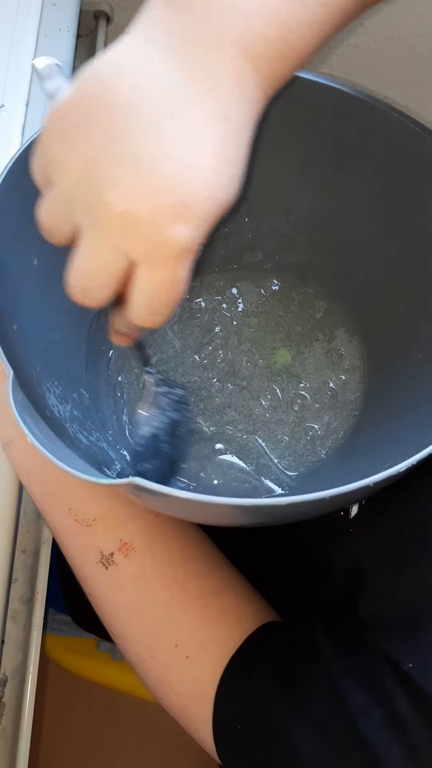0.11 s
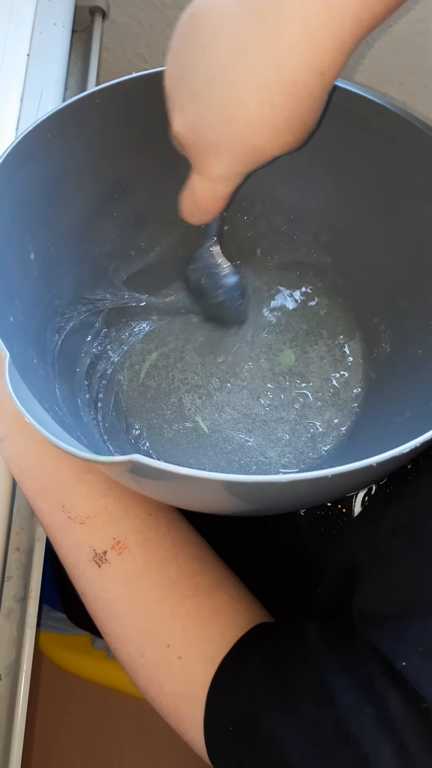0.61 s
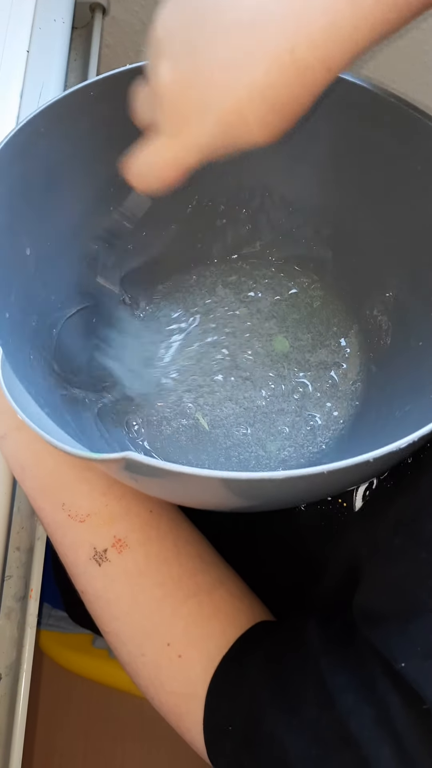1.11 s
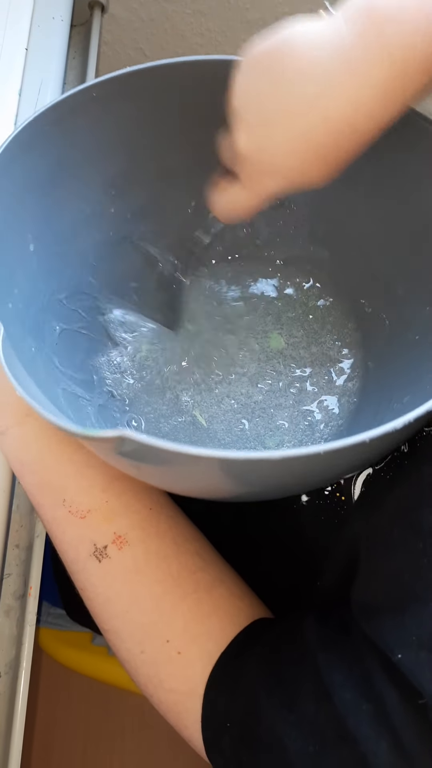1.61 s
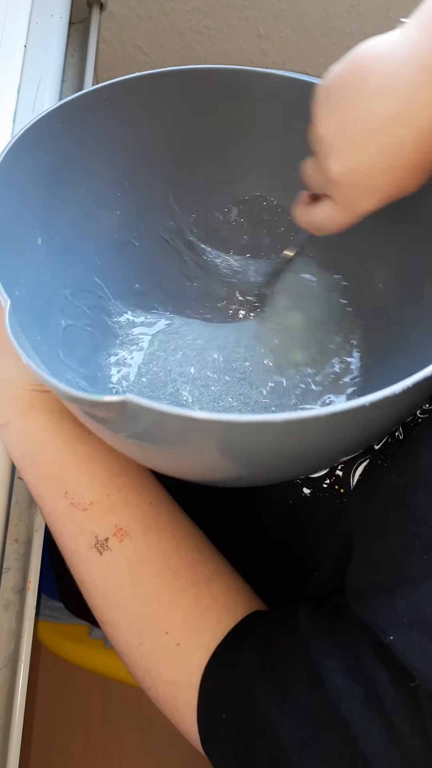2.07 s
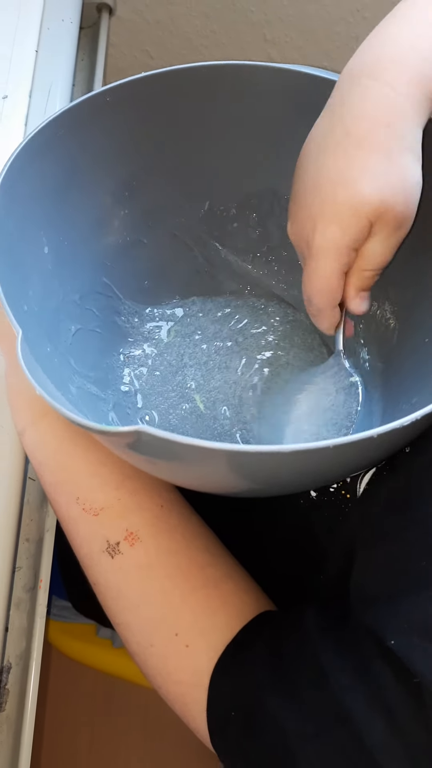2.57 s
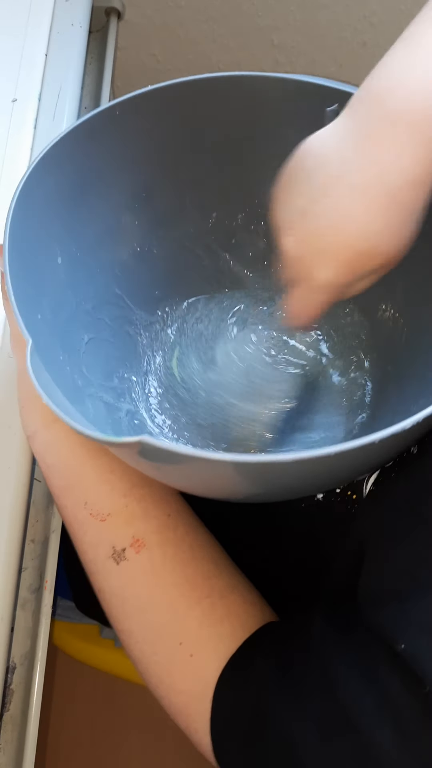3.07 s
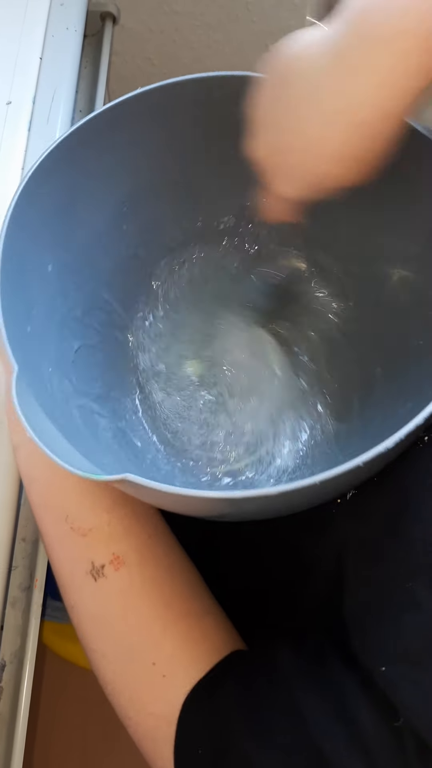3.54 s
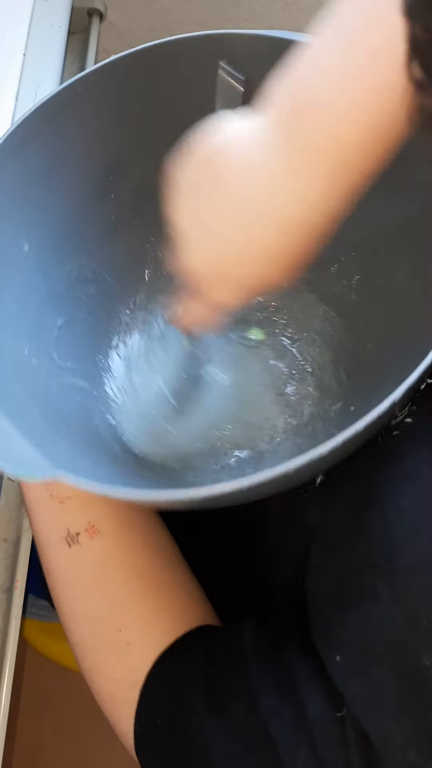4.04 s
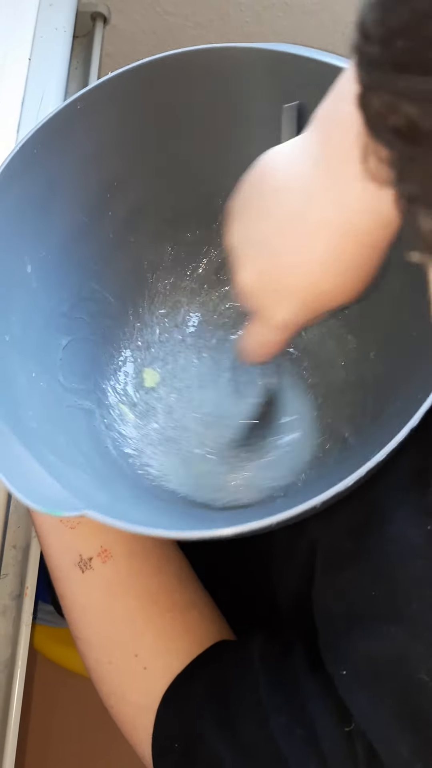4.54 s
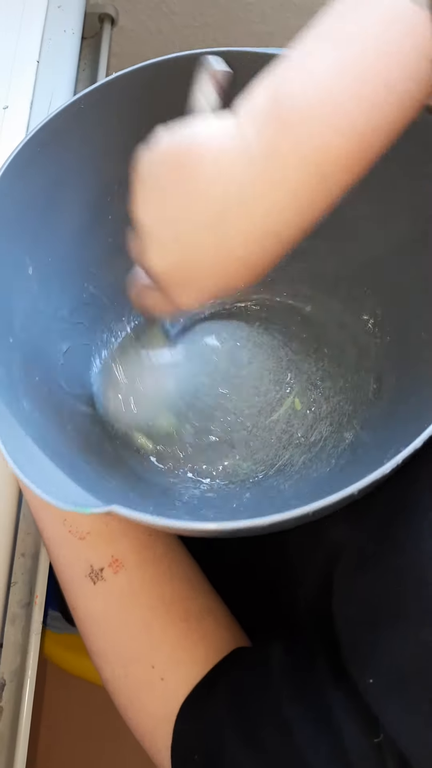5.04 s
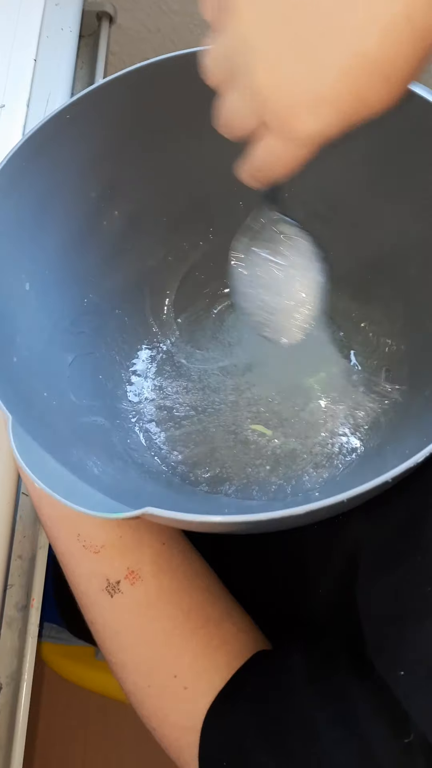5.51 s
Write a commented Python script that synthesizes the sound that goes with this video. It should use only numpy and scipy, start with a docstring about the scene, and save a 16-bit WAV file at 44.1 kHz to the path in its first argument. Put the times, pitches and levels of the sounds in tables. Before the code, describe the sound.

Close stereo microphone in a small quiet room. Wet, gluey slime is stirred with a spoon in a plastic bowl. Uneven strokes and a short pause lead to loud knocks with bright sticky cracks, strongest around one and a half seconds. Afterwards faster, gentler stirring runs on, squelching and rasping with light taps, shifting slightly side to side, over very faint room noise.

```python
"""In a small room, a metal spoon stirs sticky slime in a plastic bowl close to a two-port microphone.
Knocks excite decaying modes of bowl and spoon; uneven stick-slip clicks drive the same modes in a drag.
Behind the spoon an air pocket squelches, the wet film hisses as shaped noise, and threads snap as
short bright bursts. Echoes in the bowl and a diffuse room tail follow the direct sound.
Low noise swells as the bowl shifts on a lap, over a steady hush."""
import sys
import numpy as np
from scipy import signal
from scipy.fft import rfft, irfft, next_fast_len
from scipy.io import wavfile
from scipy.ndimage import uniform_filter1d

SR = 44100
rng = np.random.default_rng(int(sys.argv[2]) if len(sys.argv) > 2 else 0)


def persist_wave(psi):
    """Save psi, clipped to +-1, as 16-bit WAV."""
    counts = np.round(np.clip(psi, -1, 1) * 32767).astype(np.int16)
    wavfile.write(sys.argv[1], SR, np.atleast_2d(counts).T)


def elevation(decibels):
    """Turn decibel levels (scalar or array-like) into linear amplitude ratios."""
    levels = np.asarray(decibels, float)
    return 10 ** (levels / 20)


N = 248768

# All levels in the tables are relative.
# hush of the room, spectral density: frequency_hz, density_db
HUSH_SPECTRUM = [(88, -36.5), (150, -11), (190, -12.5), (259, -12), (280, -9), (341, -6), (398, -18),
                 (545, -10), (716, -18.5), (1290, -27), (16000, -40.5)]
HUSH_DB = -72
# bowl moving on the lap, spectral density: frequency_hz, density_db
RUMBLE_SPECTRUM = [(20, -24.5), (45, 7.5), (68, 9.5), (95, -2), (130, 1.5), (170, -7.5), (300, -34),
                   (600, -42.5)]
# shifts of the bowl: peak_s, level_db
BOWL_SHIFTS = [(0.0, -58.5), (0.45, -52.5), (0.85, -64.5), (1.32, -69), (1.55, -65), (1.8, -68), (2.4, -71),
               (3.3, -69), (5.21, -67.5)]
SHIFT_RISE_DB_PER_S, SHIFT_FALL_DB_PER_S, RESTING_DB = 245.5, 97, -77
# reverberation time of the room: frequency_hz, t60_s
ROOM_DECAY = [(200, 0.32), (1000, 0.29), (4000, 0.23), (14000, 0.087)]
# response of the microphone: frequency_hz, gain_db
MIC_RESPONSE = [(100, 0.5), (8300, 0), (9700, -1.5), (11200, 3), (12300, -0.5), (14000, 0.5), (16000, 2)]
# balance of the two ports: frequency_hz, left_minus_right_db
PORT_BALANCE = [(60, 8.5), (180, -1), (550, 3), (1650, 3.5), (4970, 4), (15000, -4.5)]
# sideways place of the spoon, as a balance about its mean: time_s, left_minus_right_db
SPOON_SIDE = [(0.0, 1.0), (2.37, 4.0), (3.47, 1.5), (3.61, 6.5), (3.68, 0.5), (4.6, 4), (4.65, 8),
              (4.7, -3.5), (4.99, 6), (5.26, -0.5), (5.45, 6.0), (5.64, 4)]
# radiation of a small bowl, which moves little air in the bass: frequency_hz, gain_db
RADIATION = [(20, -76), (100, -13.5), (190, -6.5), (260, 2), (20000, 0)]
LEAD_S = 0.00015  # the left port hears the bowl first
DISTANCE_M = 0.5  # delays knocks, snaps and splashes
# wet film, spectral density: frequency_hz, density_db
FILM_SPECTRUM = [(470, -24), (800, -13.5), (992, -8.5), (1080, -5.5), (1430, -8.5), (1820, -4.5),
                 (2600, -7), (2870, -9), (3180, -9), (3430, -10.5), (7240, -10), (10100, -18), (13500, -14),
                 (15900, -24), (16500, -54.5)]
# threads of slime that snap or are slapped flat: start_s, level_db, pitch_hz
THREAD_SNAPS = [(0.002, -34, 5700), (0.253, -45, 5000), (0.446, -52, 12000), (0.799, -24.5, 4170),
                (0.901, -30, 3680), (0.994, -38.5, 4230), (1.186, -36.5, 11200), (1.312, -31.5, 4000),
                (1.525, -22.5, 5850), (1.527, -18, 11500), (1.57, -41.5, 6700), (1.644, -50.5, 6200),
                (1.792, -41.5, 6600), (1.928, -35.5, 3700), (1.991, -58, 3780), (2.407, -61.5, 3980),
                (2.33, -43.5, 6550), (2.597, -48, 6200), (2.986, -48, 6400), (3.237, -54.5, 5270),
                (3.315, -58, 6300), (3.341, -63.5, 8310), (3.434, -43, 4000), (3.493, -43.5, 14700),
                (3.55, -46, 5500), (3.61, -29, 6530), (3.705, -42.5, 6030), (3.883, -43, 7600),
                (3.944, -48, 4150), (4.074, -48, 5200), (4.29, -35.5, 7700), (4.652, -34, 4020),
                (4.751, -57.5, 6000), (4.869, -45.5, 11880), (4.879, -60, 9000), (4.984, -31, 7040),
                (5.014, -51, 4800), (5.205, -51, 4470), (5.297, -54.5, 7000)]
SPLASH_DB, SPLASH_T60_S = -16, 0.046  # the film hisses briefly after each snap
# modes of the bowl wall before damping by slime: frequency_hz, level_db, t60_s
BOWL_MODES = [(131.5, 5, 0.57), (200, -27.5, .15), (253.4, -5, 0.83), (305, -30.5, 0.6), (305, -33, 0.32),
              (361.8, 2, 0.34), (378, -7, 0.61), (423.7, -1, 0.31), (425, -10, 0.35), (463, -2, 0.4),
              (464, -13.5, 0.73), (523.3, -3.5, 0.23), (551, -10, 0.87), (613, 2, 0.17), (720, -6, .08),
              (717, -4, 0.23), (785, -19, 0.076), (881, -21, 0.04), (904, -23, 0.24), (1090, -16.5, 0.23),
              (1236, -23.5, 0.24)]
# modes of the spoon against the wall before damping by slime: frequency_hz, level_db, t60_s
SPOON_MODES = [(1020, -6.5, 0.018), (1185, 5, 0.012), (1500, -5.5, .02), (1770, -10.5, 0.023),
               (1860, 12, 0.019), (2140, -3, 0.032), (2140, -21, 0.029), (2264, 9, 0.034),
               (2280, -3.5, 0.022), (2460, -13, 0.083), (2756, 5.5, 0.019), (3120, 1.5, 0.035)]
# one table a stroke: time_s, speed_db, wall_pressure_db
STROKE_PATHS = [
    [(0.01, -51.5, -53), (0.066, -56.5, -51.5), (0.238, -55.5, -63.5), (0.25, -54, -61.5),
     (0.334, -57.5, -73.5), (0.385, -55.5, -78)],
    [(0.385, -59, -69), (0.431, -68, -57.5), (0.445, -69, -61), (0.473, -75, -70.5), (0.6, -100, -93)],
    [(0.81, -46.5, -82), (0.818, -51.5, -82), (0.85, -49, -78.5), (0.86, -40.5, -75.5), (0.894, -59.5, -62),
     (0.9, -69, -69)],
    [(0.915, -35, -76), (0.939, -53, -67.5), (1.005, -48.5, -67), (1.021, -75, -68.5), (1.173, -85, -73.5),
     (1.175, -96, -69.5)],
    [(1.196, -57, -62.5), (1.262, -58.5, -67.5), (1.268, -50, -63.5), (1.288, -68, -65.5),
     (1.305, -57.5, -73)],
    [(1.322, -50, -64), (1.35, -44.5, -63.5), (1.36, -60.5, -66.5), (1.428, -69, -55), (1.515, -91, -74.5)],
    [(1.54, -37.5, -62.5), (1.544, -43.5, -60), (1.602, -47.5, -64.5), (1.62, -56, -63), (1.64, -50.5, -67)],
    [(1.652, -48.5, -59.5), (1.762, -84.5, -68), (1.785, -61, -86.5)],
    [(1.8, -47, -67), (1.834, -70, -63), (1.86, -68, -58.5), (1.878, -52, -55), (1.902, -75.5, -61.5),
     (1.922, -60.5, -59.5)],
    [(1.936, -54, -54.5), (1.952, -62, -58), (1.99, -47.5, -43.5), (2.016, -53.5, -55.5), (2.166, -50, -52),
     (2.28, -73, -62.5)],
    [(2.285, -65.5, -66), (2.327, -53, -54), (2.485, -60.5, -60.5), (2.603, -54.5, -81),
     (2.627, -91, -106.5), (2.75, -85.5, -98)],
    [(2.94, -99, -86), (2.98, -74, -69), (2.986, -55, -78), (3.048, -51.5, -55.5), (3.158, -65, -61.5),
     (3.235, -61.5, -66.5)],
    [(3.24, -76, -48), (3.26, -53.5, -43.5), (3.372, -42, -53), (3.488, -70.5, -68), (3.492, -68, -72),
     (3.59, -58.5, -63.5)],
    [(3.6, -54, -54), (3.612, -50.5, -60), (3.632, -50.5, -54), (3.74, -48, -57), (3.798, -64, -68),
     (3.876, -67, -59)],
    [(3.89, -70, -64), (3.9, -64, -76), (3.94, -63, -63)],
    [(3.95, -55, -53.5), (4.008, -63, -57.5), (4.022, -53.5, -58), (4.112, -49.5, -74.5),
     (4.212, -83.5, -99), (4.283, -68.5, -76)],
    [(4.3, -72, -59), (4.322, -65.5, -58.5), (4.476, -54, -55.5), (4.532, -56, -59), (4.586, -51, -54),
     (4.645, -72, -82)],
    [(4.665, -68, -85), (4.671, -67, -85), (4.745, -80, -80.5), (4.751, -81, -88), (4.827, -79, -81.5),
     (4.84, -73, -66.5)],
    [(4.845, -78, -74.5), (4.867, -68, -71), (4.965, -56.5, -54.5), (4.983, -52.5, -53),
     (5.029, -46.5, -58), (5.1, -49.5, -52)],
    [(5.1, -49.5, -50.5), (5.154, -51.5, -50), (5.212, -54, -56), (5.264, -66, -70), (5.55, -100, -86)],
]
# hold of the spoon in each stroke: rasp_db, squelch_db, first_pocket_hz, last_pocket_hz, gap_hz
SPOON_HOLDS = [(1, 0.5, 705, 750, 3500), (-10, -3, 610, 680, 7300), (-6, -12, 660, 720, 4700),
               (-1, -4.5, 850, 780, 1700), (-8.5, -8, 650, 800, 3600), (-16.5, -8.5, 610, 610, 3800),
               (-1, -12, 760, 730, 1700), (-15, -20.5, 690, 650, 3900), (-6.5, -11, 800, 860, 4700),
               (-3.5, -1.5, 830, 740, 6000), (4, 5, 700, 1300, 5000), (0, -6.5, 800, 820, 7900),
               (4.5, -4.5, 780, 850, 1500), (2, -3.5, 650, 1100, 7600), (-0.5, -10, 680, 660, 6000),
               (-4, 6.5, 630, 900, 5000), (1, 0, 600, 1200, 11000), (-15, -20, 760, 970, 4000),
               (0, 5, 560, 1050, 7400), (0.5, -5.5, 1050, 860, 4500)]
HISS_DB, DRAG_DB = -4, -2.5  # the film follows speed, the bowl follows pressure
POCKET_OCTAVES, GAP_OCTAVES = 0.05, 0.2  # rms wander as the slime folds
# spoon meeting the wall: start_s, thud_db, clack_db, struck_patch_hz
WALL_KNOCKS = [(0.002, -23, -57, 334), (0.135, -38, -25, 323), (0.252, -60, -27.5, 748),
               (0.379, -46, -44, 345), (0.799, -18, -40, 413), (0.904, -19, -21.5, 430),
               (0.928, -24, -22.5, 460), (1.185, -21.5, -23, 340), (1.227, -31, -33, 355),
               (1.312, -12.5, -27.5, 376), (1.526, -19.5, -22, 420), (1.57, -35.5, -43, 390),
               (1.644, -17.5, -34, 290), (1.779, -37, -65, 263), (1.789, -23, -52, 260),
               (1.794, -25, -47, 277), (1.821, -59, -60, 283), (1.928, -14, -28, 335),
               (1.968, -25.5, -29, 368), (1.991, -27.5, -24, 353), (2.035, -32.5, -35, 347),
               (2.287, -42, -48, 700), (2.36, -33, -45, 700), (2.407, -20.5, -17, 800),
               (2.51, -47, -38, 950), (2.55, -46, -40, 1000), (2.596, -70, -33, 988), (2.93, -46, -63, 360),
               (2.985, -29, -40, 350), (3.004, -32.5, -31, 380), (3.238, -28.5, -35.5, 704),
               (3.258, -42, -23, 248), (3.276, -27, -48, 355), (3.314, -26, -41, 390),
               (3.341, -30.5, -30, 610), (3.371, -35, -23, 444), (3.436, -62, -32, 463),
               (3.552, -52, -57, 869), (3.593, -27.5, -29, 420), (3.61, -26.5, -36, 627),
               (3.638, -24.5, -28.5, 363), (3.706, -37.5, -29, 361), (3.883, -37, -35, 600),
               (3.941, -24, -38.5, 390), (3.979, -28.5, -32, 510), (3.989, -30.5, -48, 410),
               (4.009, -27, -42, 385), (4.033, -29, -30, 353), (4.075, -32.5, -30.5, 355),
               (4.291, -32, -50, 524), (4.322, -27, -50, 424), (4.362, -28.5, -60, 450),
               (4.38, -27.5, -60, 492), (4.4, -25.5, -68, 460), (4.429, -29, -30, 605),
               (4.657, -39.5, -41, 680), (4.842, -43, -63, 500), (4.878, -35, -59, 557),
               (4.962, -41, -39, 875), (4.983, -31.5, -59, 810), (5.015, -29, -35, 745),
               (5.162, -36, -50, 480), (5.204, -42.5, -24.5, 537)]
CLING_S, HELD_S = 0.004, 0.12  # time constants: slime on the spoon, the arm round the bowl


def evened(x):
    """Normalisation: equal mean power, rms 1."""
    return x / np.sqrt(np.mean(x ** 2) + 1e-20)


def read(points, hz):
    """Interpolation on a logarithmic frequency axis."""
    f, value = np.transpose(points)
    return np.interp(np.log(hz + 1), np.log(f + 1), value)


def coloured(x, points):
    """Minimum phase: a causal filter of unit energy follows from its magnitude by the Hilbert transform."""
    hz = abs(np.fft.fftfreq(4096, 1 / SR))
    log_gain = np.log(elevation(np.maximum(read(points, hz), -100)))
    response = np.exp(np.conj(signal.hilbert(log_gain)))
    taps = np.fft.ifft(response).real[:2048]
    return signal.oaconvolve(x, taps / np.linalg.norm(taps))[:len(x)]


def drift(count, per_s):
    """Low-pass fluctuation: averaged noise gives slow random curves of about rms 1."""
    knots = rng.standard_normal((count, round(N / SR * 400)))  # 400 a second
    knots = evened(uniform_filter1d(knots, max(round(400 / per_s), 1), 1))
    place = np.arange(N) * 400 / SR
    return np.array([np.interp(place, np.arange(len(k)), k) for k in knots])


def resonate(x, hz, width_hz):
    """Heterodyne resonance: low-pass filtering in a turning frame lets the band glide."""
    turn = np.exp(2j * np.pi * np.cumsum(hz * np.ones(len(x))) / SR)
    r = np.exp(-np.pi * width_hz / SR)
    return 2 * (turn * signal.lfilter([1 - r], [1, -r], x / turn)).real


def noise_pair(points, same):
    """Partial coherence: two noises of one colour share a common part."""
    a, b = rng.standard_normal((2, N))
    same = np.clip(same, 0, 1)
    partner = same * a + np.sqrt(1 - same ** 2) * b
    return evened(np.array([coloured(x, points) for x in (a, partner)]))


def hush():
    """Stationary background: steady coloured noise, nearly incoherent between the ports."""
    return elevation(HUSH_DB) * noise_pair(HUSH_SPECTRUM, 0.16)


def rumble():
    """Amplitude modulation: low noise swells exponentially as the bowl shifts on the lap."""
    t = np.arange(N) / SR
    level = elevation(RESTING_DB)
    for s, db in BOWL_SHIFTS:
        slope = np.where(t < s, SHIFT_RISE_DB_PER_S, SHIFT_FALL_DB_PER_S)
        level = level + elevation(db - slope * abs(t - s))
    return level * noise_pair(RUMBLE_SPECTRUM, 0.86)


def rotating(x, answers):
    """Moving source: the spoon goes round, so its sound passes in turn through three sets of echoes."""
    t = np.arange(N) / SR
    out = 0
    for k, answer in enumerate(answers):
        weight = np.sqrt(2 / 3) * np.cos(2 * np.pi * (1.9 * t + k / 3))  # 1.9 turns a second
        out = out + signal.oaconvolve(x * weight, answer, axes=1)[:, :N]
    return out


def room(x):
    """Diffuse reverberation: sparse taps of random sign, each band dying at its own rate."""
    taps, starts = np.zeros((3, 2, SR // 4)), np.arange(200, SR // 4 - 20, 20)
    at = starts + rng.integers(0, 20, (3, 2, len(starts)))
    np.put_along_axis(taps, at, rng.choice([-1., 1.], at.shape), 2)
    hz, t, z = signal.stft(taps, SR, nperseg=256)
    decay = elevation(-60 * t / read(ROOM_DECAY, hz)[:, None])
    tail = signal.istft(z * decay, SR, nperseg=256)[1]
    return rotating(x, tail / np.linalg.norm(tail[0, 0]))


def ports(x, wall):
    """Early reflection and binaural difference: bowl echoes, then path delay and balance at two ports."""
    x = coloured(x, RADIATION)
    # the bowl is too small to mirror bass
    bright = signal.sosfilt(signal.butter(1, 500, "high", fs=SR, output="sos"), x)
    delays = rng.integers(10, 200, (3, 2, 12))  # samples
    signs = rng.choice([-1., 1.], (3, 2, 12))
    taps = np.zeros((3, 2, 200))
    np.put_along_axis(taps, delays, signs * elevation(-10 - 0.065 * delays), 2)
    out = x + rotating(bright[None], taps) + wall
    size = next_fast_len(N + 4096)
    hz = np.fft.rfftfreq(size, 1 / SR)
    balance = elevation(np.outer([.5, -.5], read(PORT_BALANCE, hz)))
    path = balance * np.exp(-2j * np.pi * np.outer([0, LEAD_S], hz))
    side_db = np.interp(np.arange(N) / SR, *np.transpose(SPOON_SIDE))
    side_gain = elevation(np.outer([.5, -.5], side_db - side_db.mean()))
    return irfft(rfft(out, size) * path, size)[:, :N] * side_gain


def snaps():
    """Sudden release: a sharp click with a decaying spray, brightest around its own pitch."""
    out, t = np.zeros(N + SR), np.arange(3000) / SR
    sprays = rng.standard_normal((len(THREAD_SNAPS), 3000))
    for (s, db, hz), spray in zip(THREAD_SNAPS, sprays):
        at = round((s + DISTANCE_M / 343) * SR)
        decay = elevation(-60 * t / 0.0027) + elevation(-23.5 - 60 * t / .03)
        snap = spray * decay + 3 * (t == 0)
        pitched = resonate(snap, min(hz, 15500), 0.19 * hz)
        out[at:at + 3000] += elevation(db) * (0.49 * snap + 3.87 * pitched)
    return coloured(out[:N], FILM_SPECTRUM)


def film(x, gap_hz, patchy_db, gap_db):
    """Spectral shaping: clumps make drifting bright and dull patches; the spoon's gap favours one band."""
    hz, t, z = signal.stft(x, SR, nperseg=256)
    patches = uniform_filter1d(rng.standard_normal((len(t), len(hz))), 14, 0)
    patches = uniform_filter1d(patches, 8, 1).T
    octaves = np.log2((hz[:, None] + 1) / np.interp(t, np.arange(N) / SR, gap_hz))
    shape_db = patchy_db * evened(patches) + gap_db * np.exp(-(octaves / 0.04) ** 2)
    return evened(signal.istft(z * elevation(shape_db), nperseg=256)[1][:, :N])


def slips(per_s, spread_db, smooth):
    """Stick-slip friction: random uneven clicks over a share of smooth rubbing."""
    clicks, at = np.zeros(N), np.flatnonzero(rng.random(N) < per_s / SR)
    size_luck, sign_luck = rng.random((2, len(at)))
    size_db = spread_db * np.minimum(-np.log(size_luck), 4)
    clicks[at] = elevation(size_db) * np.sign(sign_luck - .5)
    return evened(evened(clicks) + smooth * rng.standard_normal(N))


def rubbed(modes, drive, damping):
    """Driven modes: a wandering contact gives each a changing share; slime shortens the ring."""
    out = np.zeros(N)
    for (hz, db, t60), share in zip(modes, drift(count=len(modes), per_s=30)):
        r, w = elevation(-60 / (damping * t60 * SR)), 2 * np.pi * hz / SR
        force = drive * (0.57 + share)
        out += elevation(db) * signal.lfilter([np.sin(w)], [1, -2 * r * np.cos(w), r * r], force)
    return evened(out)


def strokes():
    """Friction: drag rings the bowl, rasp the spoon, the pocket behind squelches, the slime film hisses."""
    t, gains = np.arange(N) / SR, np.zeros((4, N))
    glides = np.outer([800., 6000.], np.ones(N))  # pocket and gap, Hz, between strokes
    for rows, hold in zip(STROKE_PATHS, SPOON_HOLDS):
        rasp_db, squelch_db, first_hz, last_hz, held_hz = hold
        s, speed_db, pressure_db = np.transpose(rows)
        inside = slice(round(s[0] * SR), round(s[-1] * SR))
        levels_db = (speed_db + HISS_DB, pressure_db + DRAG_DB,
                     pressure_db + rasp_db, pressure_db + squelch_db)
        gains[:, inside] = [elevation(np.interp(t[inside], s, c)) for c in levels_db]
        glides[0, inside] = np.interp(t[inside], s[[0, -1]], [first_hz, last_hz])
        glides[1, inside] = held_hz
    for s, db, hz in THREAD_SNAPS:
        splash = elevation(db + SPLASH_DB - 60 * abs(t - s) / SPLASH_T60_S)
        gains[0] += splash * (t > s + DISTANCE_M / 343)
    hiss_gain, drag_gain, rasp_gain, squelch_gain = uniform_filter1d(gains, 90, 1)
    wander = np.array([[POCKET_OCTAVES], [GAP_OCTAVES]]) * drift(count=2, per_s=5.7)
    pocket_hz, gap_hz = glides * 2 ** wander
    drag = rubbed(BOWL_MODES, slips(400, 2.1, 0.26), 0.4)
    rasp = rubbed(SPOON_MODES, slips(680, 3.3, 0.15), 0.55)
    pocket = resonate(slips(500, 3., .4), pocket_hz, 140)
    squelch = evened(resonate(pocket, pocket_hz, 600))
    flicker = elevation(2. * drift(count=1, per_s=130)[0])
    grains = np.array([coloured(slips(3000, 2.1, 0.81) * flicker, FILM_SPECTRUM) for _ in range(3)])
    tip, *wall = hiss_gain * film(grains, gap_hz, patchy_db=2.5, gap_db=4.)
    spoon = drag_gain * drag + rasp_gain * rasp + squelch_gain * squelch + elevation(-3.0) * tip
    return spoon, elevation(9) * np.array(wall)  # the film spread over the wall reaches each port apart


def ring(modes, place_db, detune, count):
    """Modal superposition: decaying sines, weighted by the place of the blow, scaled to peak 1."""
    hz, db, t60 = np.transpose(modes)
    poles = np.exp((2j * np.pi * hz * detune - np.log(1000) / t60) / SR)
    blow = signal.unit_impulse(count)
    decay = np.zeros(count)
    for gain, p in zip(elevation(db + place_db), poles):
        decay += gain * signal.lfilter([0, p.imag], [1, -2 * p.real, abs(p) ** 2], blow)
    return decay / abs(decay).max()


def knocks():
    """Impact excitation: each blow is a thud of the bowl and a clack of the spoon, softened by slime."""
    out, t = np.zeros(N + SR), np.arange(SR // 5) / SR
    bowl_count = len(BOWL_MODES)
    luck = rng.standard_normal((len(WALL_KNOCKS), 2, bowl_count + len(SPOON_MODES)))
    slosh = np.pad(drift(count=1, per_s=60)[0], (0, SR))
    bowl_hz, short = np.transpose(BOWL_MODES)[0], t[:3000]
    for (s, thud_db, clack_db, patch_hz), (place, shift) in zip(WALL_KNOCKS, luck):
        at = round((s + DISTANCE_M / 343) * SR)
        favoured_db = -12. * abs(np.log2(bowl_hz / patch_hz))  # modes near the struck patch take most
        thud_place_db = favoured_db + 3 * place[:bowl_count]
        thud = ring(BOWL_MODES, thud_place_db, 1 + .025 * shift[:bowl_count], count=len(t))
        thud *= .4 + .6 * np.exp(-t / .009)  # the spoon stays on the wall and chokes the first swing
        clack = ring(SPOON_MODES, 3 * place[bowl_count:], 1 + .05 * shift[bowl_count:], count=3000)
        # light blows land through a cushion of slime, which also damps their ring
        rise_s = min(0.00014 * elevation(-.8 * (thud_db + 14.0)), .003)
        cushion = (1 - np.exp(-t / rise_s)) * np.exp(-t * rise_s / .0003 - t / HELD_S)
        waver_db = 5 * slosh[at:at + len(t)] * (1 - np.exp(-t / .01))  # moving slime
        out[at:at + len(t)] -= elevation(thud_db + waver_db) * thud * cushion
        clack_shape = (1 - np.exp(-short / min(rise_s, .0006))) * np.exp(-short / CLING_S)
        out[at:at + 3000] += elevation(clack_db + 11.0) * clack * clack_shape
    return out[:N]


def scene():
    """Superposition: spoon and bowl through the ports and the room, over rumble and hush."""
    spoon, wall = strokes()
    near = ports(spoon + knocks() + snaps(), wall)
    return near + elevation(-10.5) * room(near) + rumble() + hush()


def top_cut(x):
    """Nothing passes above the cut-off."""
    return signal.sosfilt(signal.butter(12, 16820, fs=SR, output="sos"), x)


def record(dry):
    """Transduction: the microphone ports colour the sound."""
    mix = np.array([coloured(x, MIC_RESPONSE) for x in dry])
    return top_cut(mix)


dry = scene()
out = record(dry)
persist_wave(out)
```